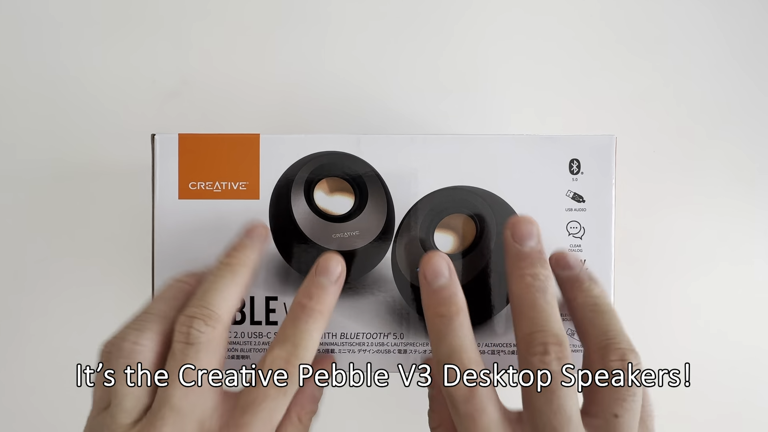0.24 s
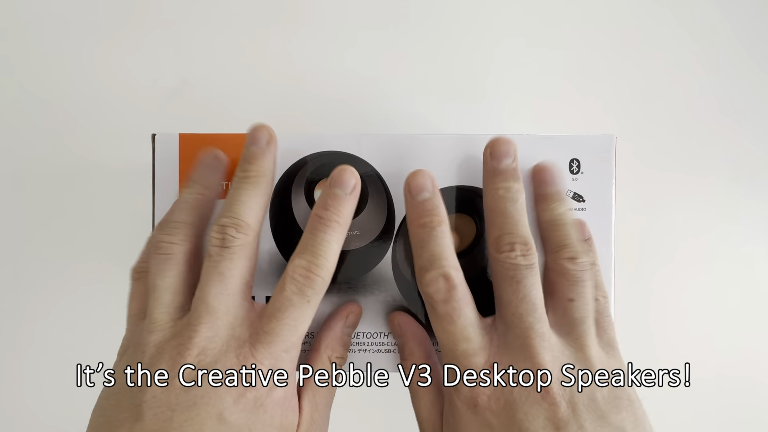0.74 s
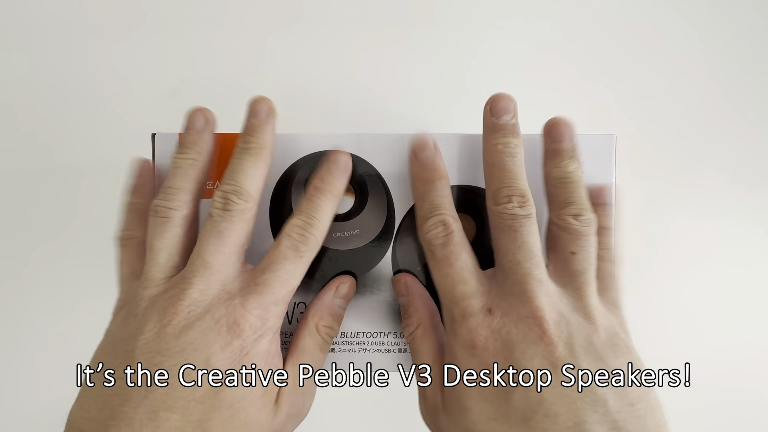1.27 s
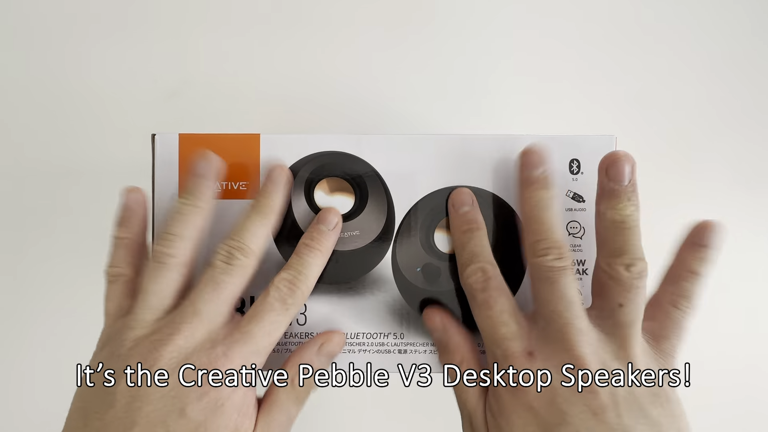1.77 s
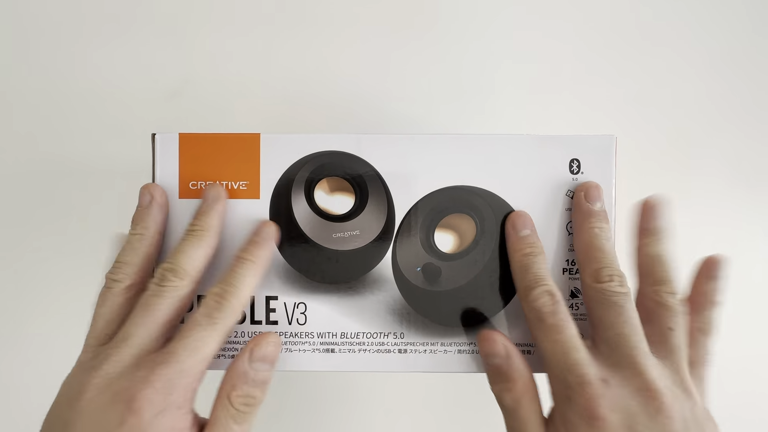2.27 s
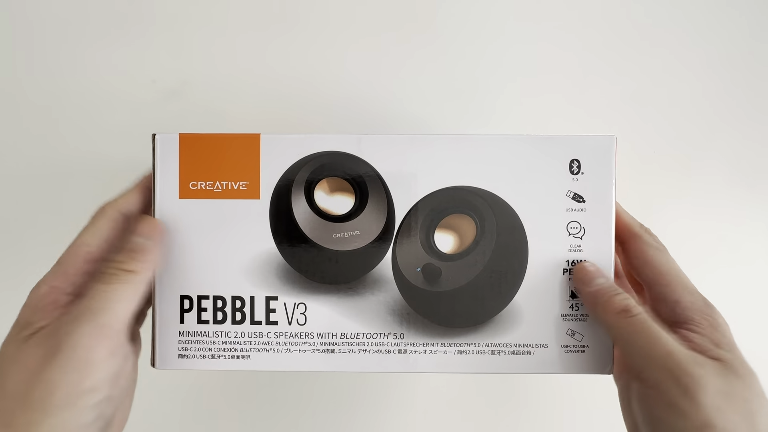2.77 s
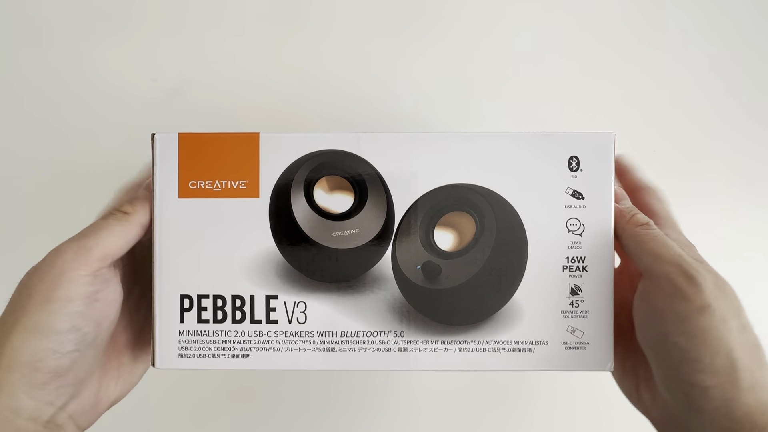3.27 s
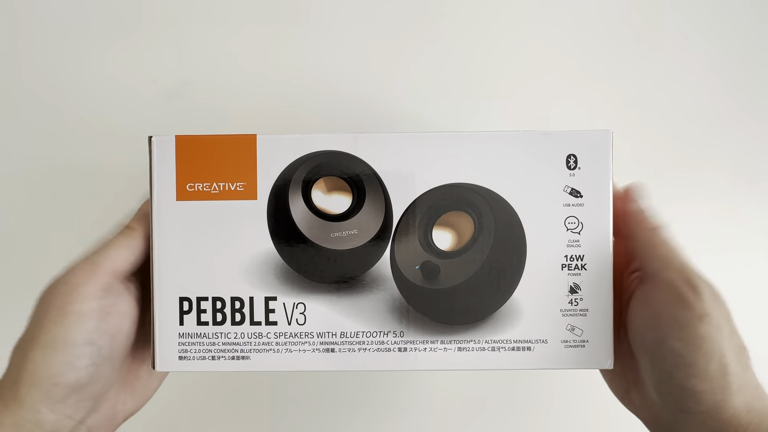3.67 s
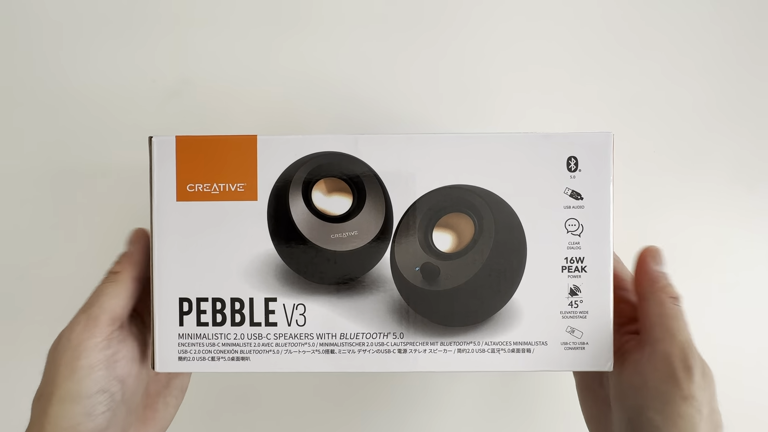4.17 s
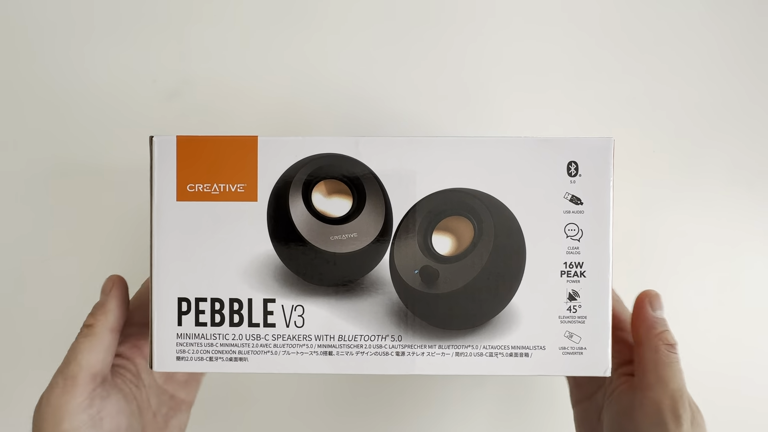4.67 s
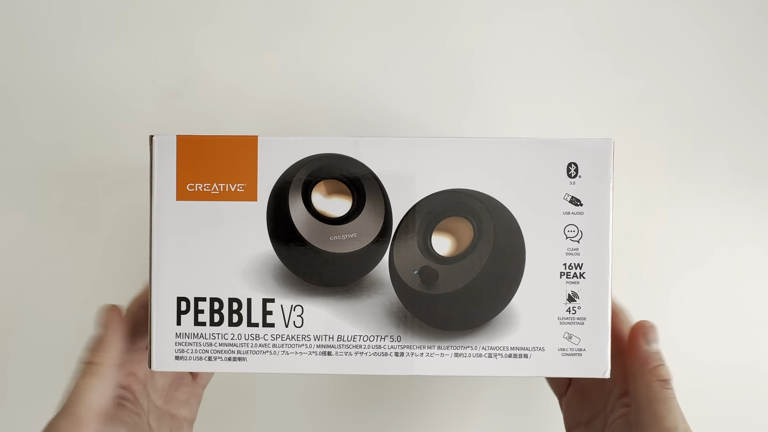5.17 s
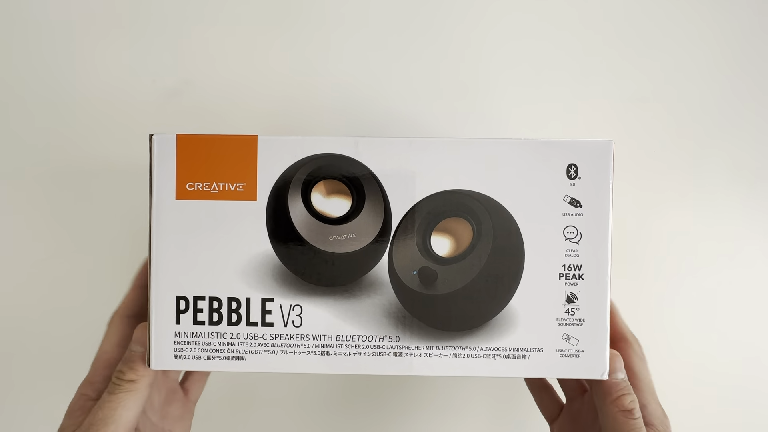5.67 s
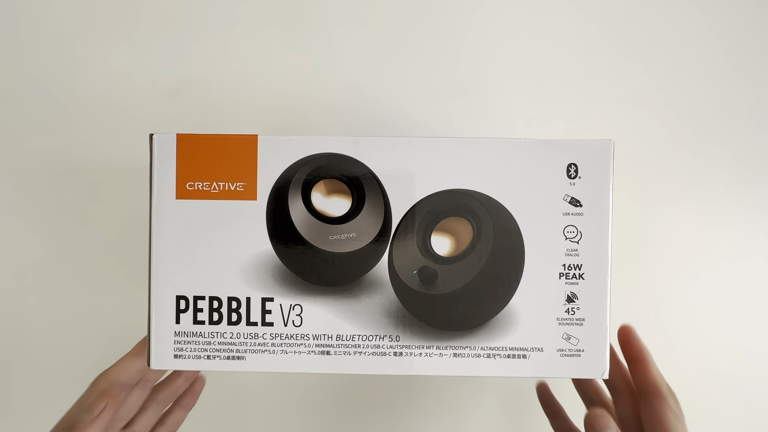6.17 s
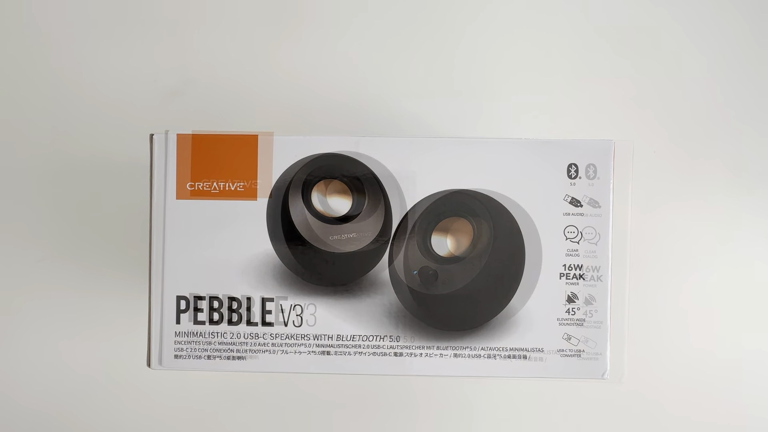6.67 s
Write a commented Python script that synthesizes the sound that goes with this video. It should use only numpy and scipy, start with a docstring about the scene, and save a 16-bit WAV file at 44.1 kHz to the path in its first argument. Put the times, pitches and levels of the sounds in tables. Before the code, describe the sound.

A quiet room with low rumble and faint hiss, picked up by a close stereo pair. From 0 s fingers drum on the lid of a full cardboard box on a table: firm, damped thumps at about four a second, often doubled, with soft pads pattering between them. Each falls quickly in pitch, with a dull papery knock and a tiny skin tick. The drumming grows firmer and peaks around 1.8-2.2 s. Short skin slides brush the board near 2.0, 2.35 and 3.3 s. From about 2.6 s both hands pat the stiffer side walls, higher-pitched and more echoing, fingers landing in tight rolls spread left and right. Small clicks fall among them. From 3.6 to 5.2 s the pats come roughly four a second, then weaken, the last faint touches around 6 s. Faint box and table resonance dies away, leaving rumble and hiss.

```python
"""Over low rumble, hiss and a faint slide of skin, fingers drum on the lid of a full cardboard box on a table.
Soft pads patter between firm beats, with light clicks; then both hands pat the stiffer side walls.
Each touch gives a damped thump that falls in pitch, a dispersed knock of the board and a tick of contact.
Box, table and room resonances ring on faintly, and the walls echo the touches to a close stereo pair."""
import sys
import numpy as np
from scipy import signal
from scipy.fft import rfft, irfft, next_fast_len
from scipy.io import wavfile

SR = 44100
rng = np.random.default_rng(int(sys.argv[2]) if len(sys.argv) > 2 else 0)


def to_wav(s):
    """Save 16-bit WAV."""
    ch = np.atleast_2d(s).T  # columns
    pcm = np.round(np.clip(ch, -1, 1) * 32767)  # PCM
    wavfile.write(sys.argv[1], SR, pcm.astype(np.int16))


N = 306054  # length of the scene in samples
T = np.arange(SR // 8) / SR  # time axis of one touch, s


def undb(db):
    """Level to amplitude: 20 dB is a factor of ten in gain."""
    return 10 ** (np.asarray(db) / 20)


def fade(t, t60):
    """Exponential decay: the amplitude is 60 dB down after t60 seconds."""
    return np.exp(-np.log(1000) * t / t60)


def unit(x):
    """Power normalisation: scale to rms 1."""
    return x / np.sqrt(np.mean(x ** 2))


def colour(x, points):
    """Minimum-phase filtering by a spectrum of (Hz, dB) points: causal, so attacks stay sharp."""
    hz, db = np.transpose(points)
    size = 2 * next_fast_len(x.shape[-1])
    f = np.maximum(np.fft.rfftfreq(size, 1 / SR), 1)
    gain = undb(np.interp(np.log(f), np.log(hz), db))
    # folding the cepstrum onto positive times gives the minimum phase
    cepstrum = irfft(np.log(gain))
    cepstrum[1:size // 2] *= 2
    cepstrum[size // 2 + 1:] = 0
    response = np.exp(rfft(cepstrum))
    return irfft(rfft(x, size) * response)[..., :x.shape[-1]]


def add(track, s, sound):
    """Superposition: mix a sound into a track from time s, in seconds."""
    start = max(int(s * SR), 0)
    part = sound[..., :track.shape[-1] - start]
    track[..., start:start + part.shape[-1]] += part


# Spectrum of the quiet background. Each row: frequency in Hz, relative density in dB per Hz.
BACKGROUND_SPECTRUM = [(20, -30.5), (40, -6.5), (60, -7.5), (92, -6), (125, -17.5), (340, -35.5),
                       (1400, -40.5), (2300, -37), (3000, -48), (6200, -49), (7200, -43), (8500, -48),
                       (10500, -57.5), (16000, -61)]
BACKGROUND_DB = -63  # rms


def background():
    """Partly coherent noise: low building rumble and faint microphone hiss, part common, part per channel."""
    common = rng.standard_normal(N)
    own = rng.standard_normal((2, N))
    return undb(BACKGROUND_DB) * unit(colour(common + 0.93 * own, BACKGROUND_SPECTRUM))


# Skin sliding over the print. Each row: start in seconds, length in seconds, rms level in dB before the fades.
SKIN_SLIDES = [(0, 6, -70), (0.443, 0.11, -77), (2.028, 0.071, -63), (2.354, 0.055, -49),
               (3.325, 0.092, -54)]


def slides():
    """Stick-slip friction: skin slips over the coated board in dense tiny catches, one long and faint."""
    out = np.zeros((2, N))
    for s, length, db in SKIN_SLIDES:
        size = int(length * SR)
        catch_db = np.minimum(rng.exponential(size=size), 2 * np.pi)
        catches = rng.standard_normal((2, size)) * undb(catch_db)
        rub = unit(0.34 * colour(catches, BOARD_SPECTRUM) + colour(catches, TICK_SPECTRUM))
        fades = signal.windows.tukey(size, min(0.013 / length, 1))
        add(out, s, undb(db) * fades * rub)
    return out


def press(snap_t60, crush_db, crush_t60, rise_s, roll_s, roll_db, count=3):
    """Contact force: the tip snaps down, the pad rolls on in weaker touches, paper fibres crackle under it."""
    force = (fade(T, snap_t60) + undb(crush_db) * fade(T, crush_t60)) * (1 - np.exp(-T / rise_s))
    for delay, size in rng.uniform(0.3, 1, (count, 2)):
        age = np.maximum(T - delay * roll_s, 0)
        force = force + size * undb(roll_db) * fade(age, snap_t60) * (1 - np.exp(-age / rise_s))
    crackle = rng.standard_normal((3, len(T))) * undb(0.65 * rng.exponential(size=len(T)))
    common, left, right = crackle
    return force * (common + 1.61 * np.array([left, right]))


def thump(hz, rest, bend, settle_cycles, swell_cycles, shape):
    """Contact stiffness: the note sinks as the finger pad flattens; a stiffer spot is higher and shorter."""
    cycles = hz * T
    # hz is nominal: the note sinks from (rest + bend) times hz towards rest times hz
    pitch = hz * (rest + bend / (1 + cycles / settle_cycles) ** 2)
    age = cycles / swell_cycles
    envelope = (age * np.exp(1 - age)) ** shape
    return envelope * np.sin(2 * np.pi * np.cumsum(pitch) / SR)


# Colour of the board's heavily damped knock. Each row: frequency in Hz, relative level in dB.
BOARD_SPECTRUM = [(200, -7.5), (400, 4), (600, 4), (850, 4.5), (1100, 2), (1350, 2), (1700, -2.5),
                  (2200, -5.5), (3000, -12), (5000, -19.5), (10000, -59.5)]


def knock(force, travel_s, grit_db, uneven_db=2.5):
    """Bending-wave dispersion: high tones cross the board faster and arrive first."""
    blow = undb(grit_db) * force / np.sqrt(np.mean(np.sum(force ** 2, axis=1)))
    blow[:, 0] += 1  # the impulse of first contact
    f = np.fft.rfftfreq(len(T), 1 / SR)
    delay = travel_s * rng.uniform(0.678, 1.273)  # at 1 kHz; it falls with the root of frequency
    dispersion = np.exp(-4j * np.pi * delay * np.sqrt(1000 * f))
    wave = irfft(rfft(blow) * dispersion, len(T))
    return unit(colour(wave, [(hz, db + uneven_db * rng.standard_normal()) for hz, db in BOARD_SPECTRUM]))


# Colour of the tick of skin or nail. Each row: frequency in Hz, relative level in dB.
TICK_SPECTRUM = [(300, -24), (1500, 11), (3000, 0), (6000, 1.5), (7700, -6), (9200, -2.5), (10200, -9),
                 (12000, -6.5), (14000, -9), (16000, -21)]


def tick(force, uneven_db=1.0):
    """Direct radiation: the contact force itself is heard, never twice in the same colour."""
    return unit(colour(force, [(hz, db + uneven_db * rng.standard_normal()) for hz, db in TICK_SPECTRUM]))


# Narrow resonances of box, table and room that ring on.
# Each row: frequency in Hz, relative level at resonance in dB, decay time t60 in seconds.
RESONANCES = [(57.5, 17, 1.68), (114.1, -6.5, 0.3), (160.2, -2.5, 0.61), (211, -21.5, 0.83),
              (261, -21, 0.75), (321, -1.5, 0.16), (550, -8.5, 0.19), (896, -11, .28), (986, -17.5, 0.37),
              (1156, 2.5, 0.36), (1350, -19, 0.19)]


def rings(uneven_db=3):
    """Modal resonance: each mode stores a little of a blow and reaches each microphone at its own phase."""
    t = np.arange(SR) / SR
    response = 0
    for hz, db, t60 in RESONANCES:
        phase = rng.standard_normal((2, 1)) * min(hz / 300, 2)
        # a slower decay adds up for longer, so the starting gain is lower
        gain = undb(db + uneven_db * rng.standard_normal()) * 2 * np.log(1000) / (t60 * SR)
        response = response + gain * fade(t, t60) * np.cos(2 * np.pi * hz * t + phase)
    return response


# Echo of the room by band. Each row: centre in Hz, relative echo level in dB, decay time t60 in seconds.
ROOM_BANDS = [(60, -15.5, 0.33), (144.3, -4.5, 0.41), (310, -3.5, 0.33), (602, -1.5, 0.32), (1200, 3, 0.25),
              (2470, 3, 0.27), (5136, 4, 0.28), (9210, 3, 0.2), (16000, -13, .22)]


def room(first_s=0.0027, build_s=0.0054, early_db=1, early_t60=0.065, alike_hz=300):
    """Reverberation: table and near walls answer at once, then a diffuse tail; bass is alike in both channels."""
    t = np.arange(SR // 2) / SR
    hz, db, t60 = np.transpose(ROOM_BANDS)
    f = np.maximum(np.fft.rfftfreq(len(t), 1 / SR), 1)
    mid, side = rfft(rng.standard_normal((2, len(t))))
    apart = np.pi / 4 * f / np.hypot(f, alike_hz)  # channels grow unlike as frequency rises
    field = mid * np.cos(apart) + np.array([[1], [-1]]) * side * np.sin(apart)
    response = 0
    for k, weight in enumerate(np.eye(len(ROOM_BANDS))):
        band = irfft(field * np.interp(np.log(f), np.log(hz), weight), len(t))
        decay = fade(t, t60[k]) + undb(early_db) * fade(t, early_t60)
        response = response + undb(db[k]) * band * decay
    return response * np.clip((t - first_s) / build_s, 0, 1) / np.sqrt(SR)


LEFT_LAG = 12  # samples


def taps(rows, wall, board, contact, thump_db, knock_db, tick_db, sway_db, sway_hz, sway_t60,
         treble_pan_db, room_db, ring_db, count=7):
    """Direct and reverberant fields of one kind of touch; each of a few spots has its own path into the room."""
    direct, echo = np.zeros((2, 2, N))
    paths = [undb(ring_db) * rings(uneven_db=5.5) for _ in range(count)]
    for path in paths:
        add(path, 0, undb(room_db) * room())
    spread = np.array([[.5], [-.5]])  # shares a left-minus-right level between the channels
    # the whole box gives under the blow
    sway = np.sin(2 * np.pi * sway_hz * T) * fade(T, sway_t60) * (1 - np.exp(-T / 0.0034))
    for k, (s, low_db, hz, mid_db, high_db, pan_db) in enumerate(rows):
        force = press(**contact)
        body = undb(low_db + thump_db) * (thump(hz, **wall) + undb(sway_db) * sway)
        body = body + undb(mid_db + knock_db) * knock(force, **board)
        skin = undb(high_db + tick_db) * tick(force)
        panned = body * undb(spread * pan_db) + skin * undb(spread * (pan_db + treble_pan_db))
        add(direct, s, panned)
        add(echo, s, signal.fftconvolve(body + skin, paths[k % count], axes=1))
    direct[0] = np.roll(direct[0], LEFT_LAG)  # the left microphone is a little further off
    return direct + echo * undb(spread * -2)


USUAL_DB, CONTACT_GROWTH = -28, 0.48  # an ordinary touch; dB of knock and tick per dB of strength
TICK_PER_HARDNESS = 0.79  # dB of tick per dB of hardness
PAN_SCATTER_DB, PITCH_SCATTER = 5.5, 0.1  # spread of left minus right; relative spread of pitch


def touch(s, db, hz, hard_db, pan_db):
    """Impact spectrum: weight goes mostly into the thump, hardness into knock and tick."""
    contact_db = USUAL_DB + CONTACT_GROWTH * (db - USUAL_DB)
    mid_db = contact_db + hard_db
    high_db = contact_db + TICK_PER_HARDNESS * hard_db
    return s, db, hz, mid_db, high_db, pan_db + PAN_SCATTER_DB * rng.standard_normal()


def spot(hz):
    """Local stiffness: no two fingers land on quite the same spot, so the pitch varies a little."""
    return hz * np.exp(PITCH_SCATTER * rng.standard_normal())


# Soft finger pads pattering on the lid between the beats. Each row: start in seconds, relative strength in dB.
PAD_PATTER = [(0.025, -29), (0.076, -26.5), (0.505, -28.5), (0.649, -29), (0.687, -28), (0.734, -28.5),
              (0.904, -25), (0.939, -27.5), (0.986, -25), (1.105, -29), (1.164, -28), (1.2, -30),
              (1.228, -34), (1.257, -27), (1.344, -35), (1.397, -32), (1.434, -35), (1.471, -26),
              (1.581, -26), (1.633, -25), (1.712, -23.5), (1.818, -23.5), (1.858, -26.5), (1.914, -27),
              (1.944, -26.5), (2.057, -29), (2.095, -31), (2.154, -24.5), (2.166, -23.5), (2.275, -33),
              (2.349, -32.5), (2.389, -34.5), (2.488, -41.5), (2.519, -30), (2.551, -32)]
# Firm fingertips on the lid, strongest on a beat of about four a second, often two at once.
# Each row: start in seconds, relative strength in dB, nominal pitch in Hz, hardness in dB.
FIRM_BEATS = [(0.058, -25.5, 148, -4.5), (0.32, -20, 188, -6.5), (0.362, -24, 136, 0.5), (0.4, -27, 110, 2),
              (0.436, -35, 210, 14), (0.571, -19.5, 184, -0.5), (0.586, -23, 187, 4),
              (0.812, -21, 180, 0.5), (0.824, -21.5, 210, 6), (1.066, -27, 184, 4),
              (1.078, -28.5, 196, 6.5), (1.309, -24, 148, 5), (1.316, -28.5, 179, 4.5),
              (1.458, -29.5, 200, 7), (1.553, -23.5, 210, 7), (1.698, -23, 128, 4), (1.783, -16.5, 215, 1),
              (1.791, -20, 161, 9), (1.805, -34, 130, 13), (2.002, -16, 178, 6.5), (2.227, -19.5, 255, 6.5),
              (2.245, -26, 215, 4), (2.253, -30, 190, 10.5)]
PAD_HZ, LID_PAN_DB = 126.4, -6  # nominal pitch of a pad; left minus right before scatter


def drumming():
    """Impact excitation of the lid: firm beats, with soft pads filling the gaps."""
    beats = [touch(s, db, hz, hard_db, LID_PAN_DB) for s, db, hz, hard_db in FIRM_BEATS]
    patter = [touch(s, db, spot(PAD_HZ), 0, LID_PAN_DB) for s, db in PAD_PATTER]
    return beats + patter


# Light clicks as a nail grazes the board or a finger lifts off.
# Each row: start in seconds, relative strength in dB, brightness in dB.
LIGHT_CLICKS = [(0.115, -35.5, 0.5), (0.26, -51.5, 3), (0.418, -32.5, -11), (0.493, -34.5, -0.5),
                (0.87, -36.5, -7), (1.146, -51.5, 16), (1.188, -43.5, -4), (2.135, -36.5, -0.5),
                (2.324, -45, 2), (2.401, -36.5, 3.5), (2.722, -34, -0.5), (3.023, -46.5, 2),
                (3.246, -39.5, 1.5), (3.468, -31.5, 0.5), (3.711, -50, 11.5), (3.92, -43, -6),
                (3.952, -39, 2.5), (4.165, -34, -21), (4.291, -37, -4), (4.453, -32.5, -2),
                (4.519, -32.5, -4.5), (4.682, -31.5, -2.5), (4.751, -38, -3), (4.771, -36.5, 0),
                (4.983, -34.5, 3.5), (5.225, -40.5, 0.5), (5.249, -46.5, 3), (5.465, -43, 3.5),
                (5.676, -42, 7), (5.865, -52, 3), (6.047, -56, 18.5)]
CLICK_HZ, CLICK_PAN_DB = 205, -5.5  # nominal pitch of the faint thump; left minus right


def grazing():
    """Contact without weight: all parts follow the strength, and brightness lifts the tick."""
    return [(s, db, spot(CLICK_HZ), db, db + bright_db, CLICK_PAN_DB) for s, db, bright_db in LIGHT_CLICKS]


# Hands patting the side walls, fingers landing one after another.
# Each row: start in seconds, relative strength in dB, gap between fingers in seconds,
# level of each finger against the one before in dB, hardness in dB, hand.
WALL_PATS = [(2.604, -23, 0.026, -13, -3.5, "right"), (2.631, -25.5, 0.017, -12, -4, "right"),
             (2.873, -26, .012, 1.5, -2.5, "right"), (2.901, -20, 0.023, -18.5, 4.5, "right"),
             (2.91, -18.5, .016, -7, -13.5, "left"), (3.078, -26, .056, -4.5, -0.5, "right"),
             (3.147, -30.5, .017, -5, 0, "left"), (3.165, -23.5, 0.021, -14, -1.5, "left"),
             (3.178, -19.5, 0.03, -8, -4.5, "right"), (3.33, -27.5, 0.041, 0, 5.5, "right"),
             (3.397, -31, .049, -5.5, -5, "left"), (3.413, -22, 0.028, -10, -14, "right"),
             (3.561, -26, 0.049, -13.5, 3.5, "right"), (3.607, -26.5, 0.022, -4.5, -4, "left"),
             (3.641, -24, 0.038, -6, -3.5, "right"), (3.803, -28, 0.05, -10.5, 1.5, "right"),
             (3.938, -33.5, 0.013, -5.5, -5, "left"), (4.121, -38, 0.0098, -3, -3, "right"),
             (4.171, -29, 0.045, -6, -2.5, "right"), (4.218, -25.5, 0.062, -10.5, -25, "right"),
             (4.378, -23, 0.04, -12, 0.5, "right"), (4.422, -29.5, 0.023, -2, 2, "left"),
             (4.612, -26, 0.041, -7, 2, "right"), (4.625, -27.5, .041, -9.5, 2.5, "left"),
             (4.851, -22, 0.039, -8, 1, "left"), (4.865, -29.5, 0.023, -4, 5.5, "right"),
             (5.095, -23.5, 0.034, -7.5, 1, "left"), (5.13, -30.5, 0.026, -8, 1.5, "right"),
             (5.324, -32.5, .01, -5.5, -0.5, "right"), (5.335, -29.5, 0.027, -6.5, 0, "left"),
             (5.391, -29.5, .012, -25, -4, "right"), (5.572, -30.5, 0.026, -4, 1, "right"),
             (5.64, -37, 0.032, -7, -13.5, "left"), (5.786, -34, .013, -2.5, -1, "left"),
             (5.8, -33.5, 0.034, -8.5, -4.5, "right"), (6.017, -38, .032, -17.5, 0.5, "right")]
# Position of each hand. Each entry: hand, left minus right in dB before scatter.
HAND_PAN = {"left": 6, "right": -4.5}
SIDE_HZ, FINGERS = 310.6, 3  # nominal pitch of a finger on a side wall; fingers in a pat
FINGER_SOFTEN_DB = -1.8  # hardness of each finger against the one before


def patting():
    """Successive impacts on the side walls: each pat is a roll of fingers, each softer in contact than the last."""
    rows = []
    for s, db, gap_s, step_db, hard_db, hand in WALL_PATS:
        for k in range(FINGERS):
            finger_hard_db = hard_db + k * FINGER_SOFTEN_DB
            rows.append(touch(s + k * gap_s, db + k * step_db, spot(SIDE_HZ), finger_hard_db, HAND_PAN[hand]))
    return rows


def scene():
    """Superposed sources: the lid faces the microphones; the side walls face the room and sound wetter."""
    lid = taps(drumming(),
               wall=dict(rest=0.53, bend=3.204, settle_cycles=1.078, swell_cycles=1.112, shape=2.26),
               board=dict(travel_s=0.001836, grit_db=3),
               contact=dict(snap_t60=0.0099, crush_db=-15.0, crush_t60=0.074,
                            rise_s=0.00015, roll_s=0.011, roll_db=-21.0),
               thump_db=-1, knock_db=-23.5, tick_db=-33, sway_db=-4.5, sway_hz=92.6, sway_t60=0.041,
               treble_pan_db=8.0, room_db=10.0, ring_db=0.0)
    # clicks: more knock and tick against less thump
    clicks = taps(grazing(),
                  wall=dict(rest=0.66, bend=3.21, settle_cycles=0.94, swell_cycles=1.68, shape=1.7),
                  board=dict(travel_s=0.001995, grit_db=4),
                  contact=dict(snap_t60=0.012, crush_db=-24.5, crush_t60=0.035,
                               rise_s=0.00033, roll_s=0.0078, roll_db=-16),
                  thump_db=-6, knock_db=-15.5, tick_db=-24.0, sway_db=-17, sway_hz=120, sway_t60=0.06,
                  treble_pan_db=6.5, room_db=12.0, ring_db=5.5)
    sides = taps(patting(),
                 wall=dict(rest=0.66, bend=3.316, settle_cycles=1.0, swell_cycles=1.97, shape=2.9),
                 board=dict(travel_s=0.0024, grit_db=3),
                 contact=dict(snap_t60=0.017, crush_db=-30.5, crush_t60=0.019,
                              rise_s=0.00038, roll_s=0.01477, roll_db=-7.5),
                 thump_db=-3, knock_db=-20.0, tick_db=-33.5, sway_db=-6, sway_hz=131.5, sway_t60=0.058,
                 treble_pan_db=1.0, room_db=13.5, ring_db=3.5)
    return background() + slides() + lid + clicks + sides


TOP_HZ = 15900  # upper band limit


def record(dry):
    """Band limiting: the recorder drops the deepest rumble and cuts the top."""
    low_cut = signal.butter(2, 30, "high", fs=SR, output="sos")
    top_cut = signal.ellip(8, .2, 70, TOP_HZ, fs=SR, output="sos")
    return signal.sosfilt(top_cut, signal.sosfilt(low_cut, dry))


dry = scene()
out = record(dry)
to_wav(out)
```